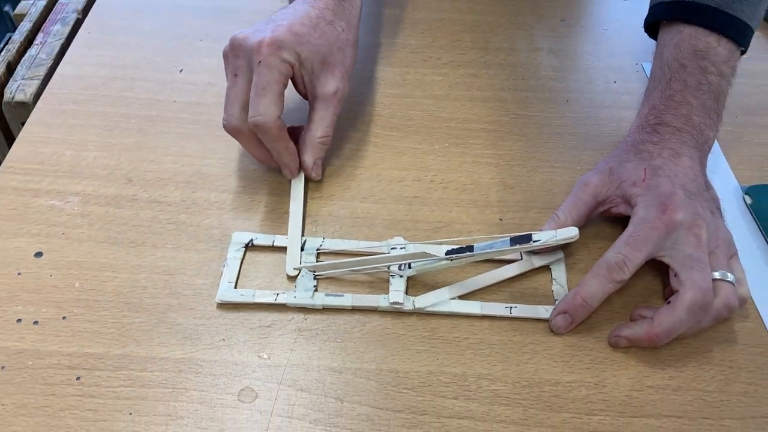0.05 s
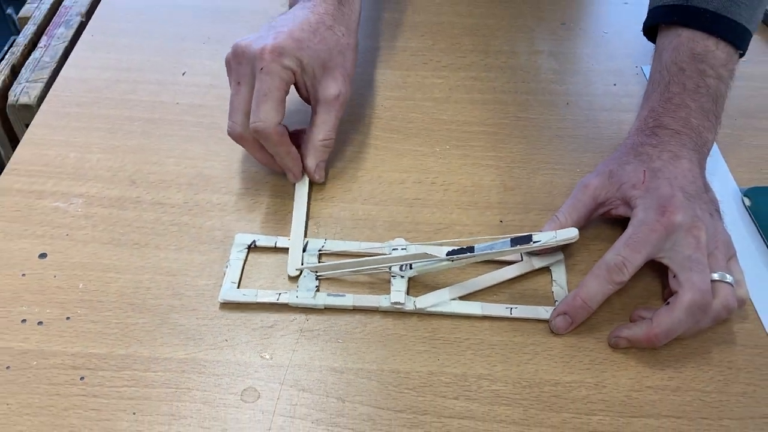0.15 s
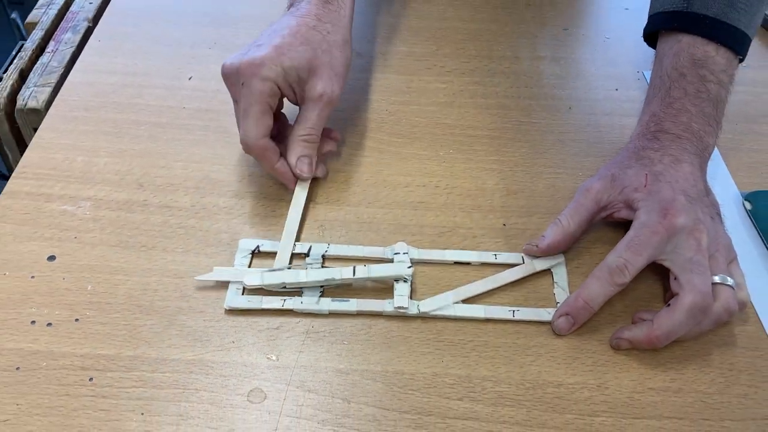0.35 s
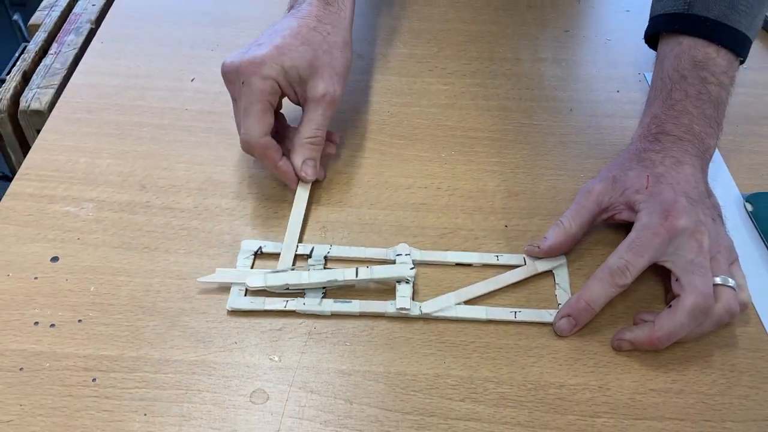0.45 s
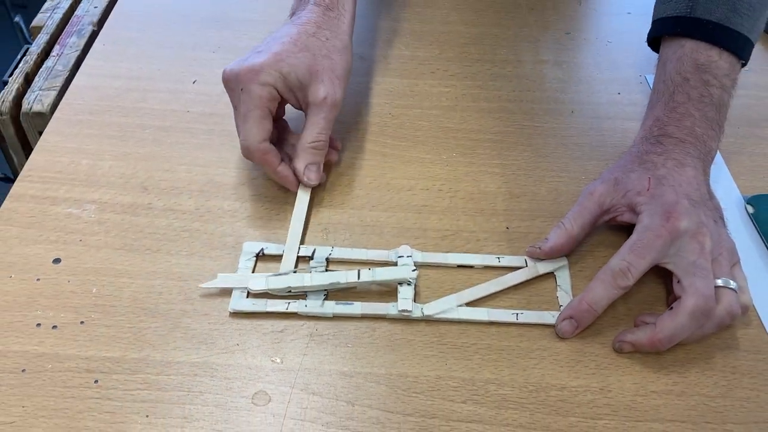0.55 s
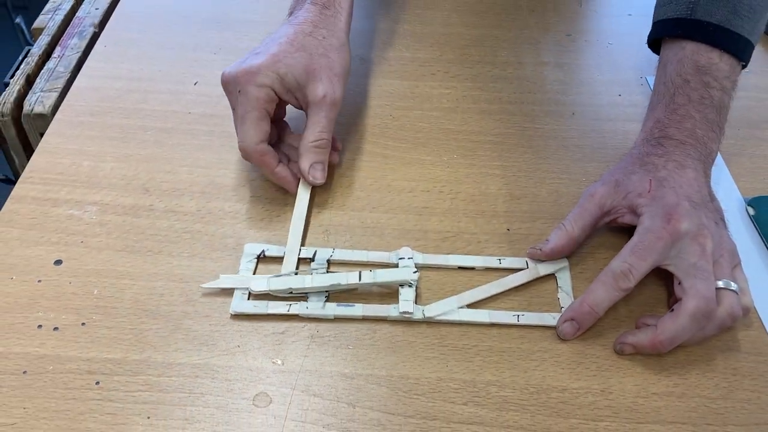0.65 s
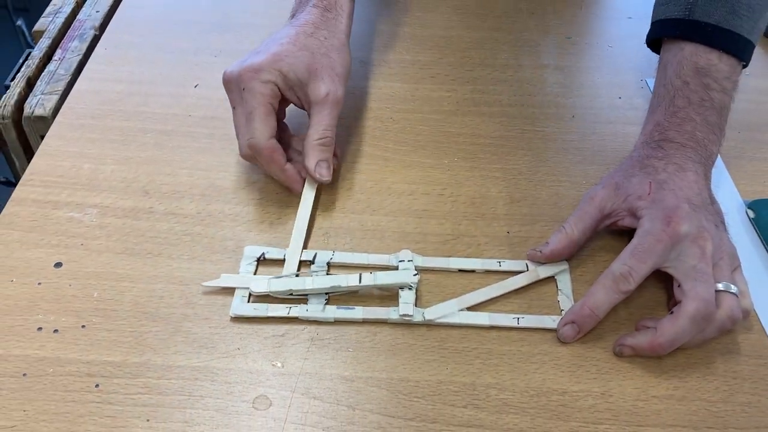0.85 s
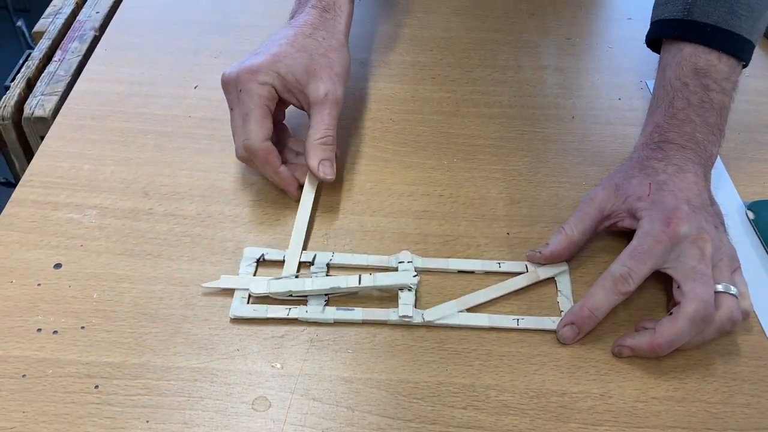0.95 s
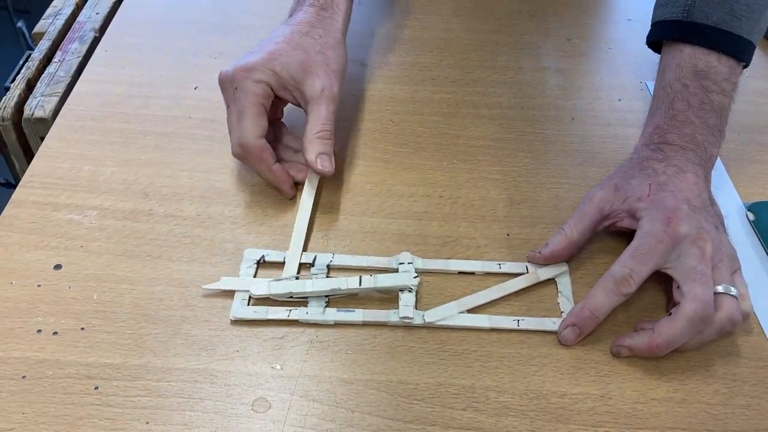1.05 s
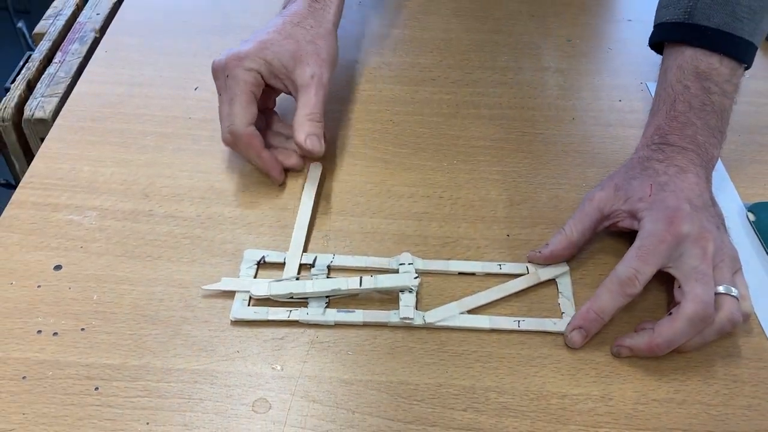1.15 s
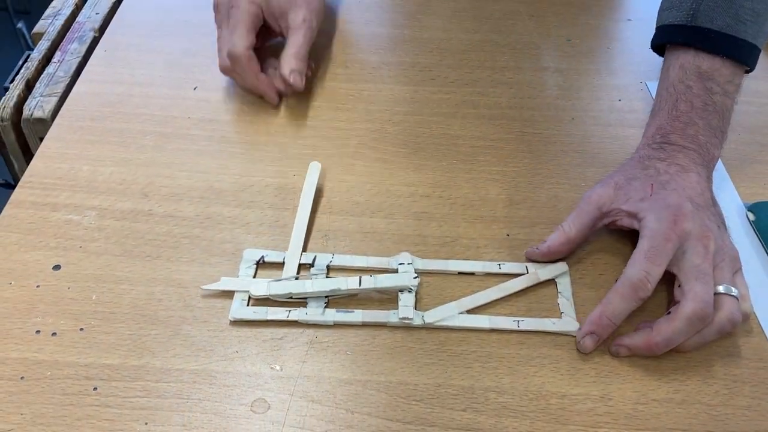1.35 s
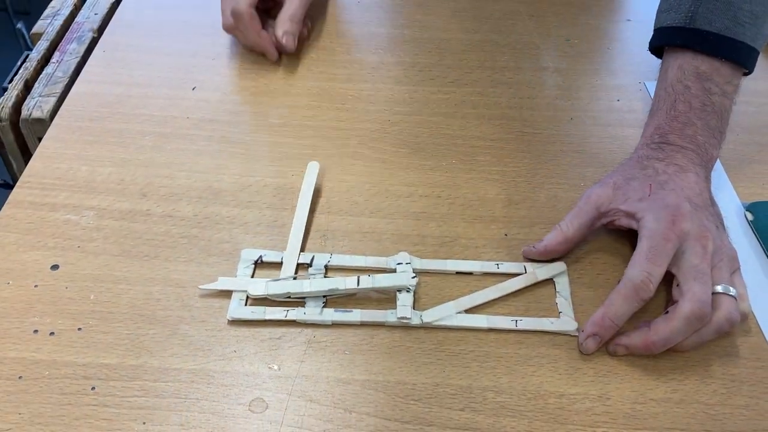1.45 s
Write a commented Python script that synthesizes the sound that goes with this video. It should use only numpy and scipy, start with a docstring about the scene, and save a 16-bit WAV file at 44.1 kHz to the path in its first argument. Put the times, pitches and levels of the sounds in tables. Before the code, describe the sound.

Loud bright wooden snap as a stick trap goes off, then quiet and faint hand rustling

```python
"""Over low room noise and faint hum, wooden sticks scrape and a sprung trap of flat sticks goes off on a table:
a hollow knock, then a burst of bright slaps from the arm on the frame, with a thump below.
Noise bursts make the cracks, damped sines the ringing wood; a live room answers with a noise tail.
The recorder's gain ducks and recovers; light finger touches follow, and the hand draws back with a soft
brushing of shaped noise. Rough noise makes the scrapes, and a low rumble comes and goes."""
import sys
import numpy as np
from scipy import signal
from scipy.fft import rfft, irfft, next_fast_len
from scipy.io import wavfile
from scipy.ndimage import uniform_filter1d, minimum_filter1d, map_coordinates

SR = 44100
rng = np.random.default_rng(int(sys.argv[2]) if len(sys.argv) > 2 else 0)


def to_wav(s):
    """Save 16-bit WAV."""
    ch = np.atleast_2d(s).T  # columns
    pcm = np.round(np.clip(ch, -1, 1) * 32767)  # PCM
    wavfile.write(sys.argv[1], SR, pcm.astype(np.int16))


N = 66150  # length in samples

# Room noise spectrum: pitch_hz, level_db (relative)
FLOOR_COLOUR = [(25, -8.5), (60, -9), (130, 6.5), (200, -7.5), (250, -9), (330, -9), (500, -16), (860, -14),
                (1300, -23), (3000, -31.5), (8000, -39), (16000, -44.5)]
# Room noise stereo image: pitch_hz, left_right_likeness (0 to 1)
FLOOR_LIKENESS = [(60, .85), (250, 0.95), (1000, 0.14), (4000, 0.033)]
# Steady tones in the room: pitch_hz, level_db (rms)
HUM_TONES = [(124, -74), (249, -76.5), (850, -86.5), (1965, -90.5)]
FLOOR_DB, FLOOR_SWAY_DB = -67.5, 1  # rms level; size of the slow random sway

# Low rumble under the handling: time_s, level_db
RUMBLE_LEVEL = [(0, -100), (.12, -66), (0.169, -56.5), (.21, -57.5), (.5, -61), (.61, -60), (0.721, -64.5),
                (.98, -68), (1.169, -69), (1.271, -61), (1.42, -59), (1.5, -60)]
# Rumble spectrum: pitch_hz, level_db (relative)
RUMBLE_COLOUR = [(25, -7.5), (55, 1), (130, -9.5), (220, -16.5), (400, -29), (2000, -67.5)]

# Wood sliding on wood: the trigger creeps and slips, the arm rubs along the frame, a stick settles:
# start_s, length_s, level_db (before the low cut), tilt_db_per_octave, swell_db (total rise)
SLIDES = [(0.179, .057, -69.5, -3.5, 7.5), (0.236, .009, -40, -3.5, 7.5), (.254, .012, -39, -3, 3),
          (0.267, 0.011, -33, -5.5, 9), (0.842, 0.0117, -79.5, 1, 1)]
SLIDE_EDGE_S, SLIDE_ROUGH_DB, SLIDE_CATCH_HZ, SLIDE_LOW_CUT_HZ = 0.0005, 0.5, 722, 601

# Room decay: pitch_hz, t60_s
ROOM_T60 = [(100, 1.126), (500, 0.66), (2000, 0.66), (5000, 0.51), (10000, 0.38), (15000, 0.32)]
# Room tail spectrum: pitch_hz, level_db (relative)
ROOM_COLOUR = [(60, -14), (130, -5.5), (200, -2.5), (320, 0), (560, 2.5), (780, -0.5), (1050, 0), (1500, 4),
               (2300, 3.5), (3500, -1.5), (5500, -1.5), (8000, -9), (12000, -6), (16000, -13.5)]
# Diffuse stereo image, shared by tail, table thud and swish: pitch_hz, left_right_likeness (0 to 1)
DIFFUSE_LIKENESS = [(100, 0.95), (500, 1), (1500, 0), (8000, 0)]
ROOM_DB, ROOM_BUILD_S = -11, 0.0047  # tail gain before colouring; build-up time constant

# Contacts of wood on wood:
# start_s, crack_db, crack_tilt_db_per_octave, frame_ring_db, table_thump_db (gains on each layer)
CONTACTS = [(.2411, -17.5, -3, -29.5, -29.5), (.2454, -26.5, -1, -46.5, -35.5),
            (.2542, -30.5, 2.5, -50, -40), (.2567, -26, 0, -48, -36), (.2622, -24.5, -1.5, -49, -47.5),
            (.2737, 4, 5, -25.5, -28.5), (.2757, 6.5, 5, -25.5, -26), (.2767, 1.5, -1.5, -28.5, -29.5),
            (.2777, 5, 14.5, -25.5, -25.5), (.2822, 3.5, -1.5, -17.5, -20), (.2831, 10, 3, -8.5, -10.5),
            (.2853, -3, 4, -17, -22)]
# Light touches of the fingers on the sticks: same columns as CONTACTS
TOUCHES = [(.700, -52.5, -8, -72, -100), (.947, -72, 3, -95, -91), (1.2415, -49.5, -4.5, -76, -51),
           (1.368, -53.5, -9, -56, -55.5)]
# Spectrum of cracking and scraping wood: pitch_hz, level_db (relative)
CRACK_COLOUR = [(100, -26.5), (500, -4.5), (1500, -8.5), (3600, -1), (5600, -4.5), (7000, 7), (7900, 6),
                (9200, -14.5), (10800, 9.5), (12200, 0), (13600, -14), (15200, 1), (16800, -20.5)]
# Stereo image of cracks and scrapes: pitch_hz, left_right_likeness (0 to 1)
CRACK_LIKENESS = [(500, 0.65), (3000, 0.14), (12000, 0.11)]
# High modes of the single sticks, rung by the crack: pitch_hz, level_db (relative to crack gain), t60_s
STICK_MODES = [(6880, -31.5, .09), (6870, -25.5, 0.033), (8010, -18, 0.051), (10440, -24.5, 0.014),
               (11300, -32.5, 0.067), (12400, -23, 0.024), (12390, -29.5, 0.045)]
# Modes of the glued frame: pitch_hz, level_db (relative), t60_s
FRAME_MODES = [(385, -20.5, 0.01), (550, -13.5, 0.012), (570, -14, .05), (740, -17.5, 0.025),
               (960, -19.5, 0.021), (1049, -6, .024), (1325, -14.5, .02), (1549, -11, .04),
               (1935, -12.5, .025), (2782, -12.5, 0.0073), (3080, -11.5, .02), (3500, -12.5, .016),
               (4150, -5, 0.019), (4443, -4, .016)]
# Modes of the table top: pitch_hz, level_db (relative), t60_s
TABLE_MODES = [(74, -5.5, .07), (114, -3, 0.042), (178.3, -4, 0.087), (199, -13, .14)]
# Dense, quickly damped modes of the table, as a noise spectrum: pitch_hz, level_db (relative)
THUD_COLOUR = [(30, -26), (70, -3), (130, 3.5), (200, 2), (320, -9), (560, -4), (900, -5), (1500, -22),
               (4000, -50.5)]
CRACK_RISE_S, CRACK_HOLD_S, CRACK_T60_S, TILT_PIVOT_HZ = .0001, 0.00049, .0035, 8020
SHIVER_DB, SHIVER_T60_S = -24.5, 0.12  # the glued sticks go on buzzing after each crack
THUD_DB, THUD_T60_S, TABLE_RISE_S = -1.5, 0.061, 0.0058
RIGHT_LEAD_S = .00007  # the right microphone is nearer

# The trigger stick rings as it slips free: pitch_hz, level_db (relative), t60_s
TRIGGER_MODES = [(499.8, -19.5, .022), (766, -10.5, .034), (1072, 1, 0.039), (1545, -14, 0.05),
                 (2660, -14.5, .014), (3330, -7, .016), (4250, -3, .011), (4520, -4.5, .013)]
TRIGGER_S, TRIGGER_DB = .2413, -25
# Each blow lands elsewhere and strains the glued joints differently:
MODE_VARY_DB, MODE_DETUNE = 1.2, .012  # random spread of level, and of pitch as a fraction
MODE_SPREAD, SPREAD_FULL_HZ = 1, 1900  # phase scatter between channels (radians), full from this pitch up

# Hiss of the withdrawing hand: time_s, level_db
BRUSH_LEVEL = [(1.04, -88.5), (1.119, -72), (1.19, -62.5), (1.27, -59.5), (1.388, -56.5), (1.5, -58.5)]
# Hiss spectrum: pitch_hz, level_db (relative)
BRUSH_COLOUR = [(200, -16.5), (1400, -16), (3300, -5), (4600, 4.5), (5700, -8.5), (7800, 7), (9200, -8.5),
                (11000, 9), (13600, -7.5), (15200, 3), (16500, -11.5)]
# Darker part of the brushing: time_s, level_db (before its grain)
SWISH_LEVEL = [(1.17, -86), (1.27, -70), (1.33, -72.5), (1.41, -66.5), (1.5, -65.5)]
# Swish spectrum: pitch_hz, level_db (relative)
SWISH_COLOUR = [(200, -6.5), (600, -3), (1400, 9), (2600, -2), (3500, -8), (8000, -19)]
SWISH_GRAIN_DB, SWISH_GRAIN_HZ = 1, 117

LIMIT_DB, HOLD_S, RELEASE_DB_PER_S, CLIP_LEVEL = -11, 0.071, 94, 0.99
LOW_CUT_HZ, TOP_HZ = 45, 16600


def amp(db):
    """Decibels to gain."""
    return 10 ** (np.asarray(db) / 20)


def unit(x):
    """Scale to rms 1."""
    return x / np.sqrt(np.mean(x ** 2) + 1e-20)


def along(points, hz):
    """Read (pitch_hz, value) points on a log pitch axis."""
    f, v = np.transpose(points)
    return np.interp(np.log(hz + 1), np.log(f + 1), v)


def level(points):
    """Gain per sample from (time_s, level_db) points."""
    return amp(np.interp(np.arange(N) / SR, *np.transpose(points)))


def fade(t, t60):
    """Exponential decay by 60 dB in t60 seconds."""
    return np.exp(-np.log(1000) * t / t60)


def wobble(hz):
    """A random curve with hz knots a second, joined by straight lines."""
    return map_coordinates(rng.standard_normal(N // 20), [np.arange(N) / SR * hz], order=1)


def filtered(x, response):
    """Shape x by a frequency response, padded so its tail does not wrap round."""
    n = x.shape[-1]
    m = next_fast_len(n + SR // 4)
    spectrum = rfft(x, m) * response(np.fft.rfftfreq(m, 1 / SR))
    return irfft(spectrum, m)[..., :n]


def paired(two, likeness):
    """Blend two unrelated signals into a left and right of given likeness."""
    def mid_side_gains(hz):
        turn = np.arccos(np.clip(along(likeness, hz), -1, 1)) / 2
        return np.array([np.cos(turn), np.sin(turn)])

    mid, side = filtered(two, mid_side_gains)
    return np.array([mid + side, mid - side])


def noise(spectrum, likeness, size=N, tilt_db=0):
    """Coloured stereo noise of rms 1, tilted in dB per octave about the pivot."""
    def colour(hz):
        octaves = np.log2(np.maximum(hz / TILT_PIVOT_HZ, 1 / 10))
        return amp(along(spectrum, hz) + tilt_db * octaves)

    stereo = paired(rng.standard_normal((2, size)), likeness)
    return unit(filtered(stereo, colour))


def ring(modes, t):
    """Damped sines, a little different at each blow; low modes reach both channels alike."""
    out = np.zeros((2, len(t)))
    for hz, db, t60 in modes:
        scatter = MODE_SPREAD * min(hz / SPREAD_FULL_HZ, 1)
        phase = scatter * rng.standard_normal((2, 1))
        pitch = hz * (1 + MODE_DETUNE * rng.standard_normal())
        gain = amp(db + MODE_VARY_DB * rng.standard_normal())
        out += gain * fade(t, t60) * np.sin(2 * np.pi * pitch * t + phase)
    return out


def background():
    """Low room noise that sways slightly, with a faint hum of steady sines."""
    t = np.arange(N) / SR
    sway = map_coordinates(rng.standard_normal(20), [t * 10])  # smooth curve, 10 knots a second
    air = amp(FLOOR_DB + FLOOR_SWAY_DB * sway) * noise(FLOOR_COLOUR, FLOOR_LIKENESS)
    hum = np.zeros(N)
    for hz, db in HUM_TONES:
        hum += amp(db) * np.sqrt(2) * np.sin(2 * np.pi * (hz * t + rng.random()))
    return air + hum


def rumble():
    """Low noise comes and goes under the handling."""
    return level(RUMBLE_LEVEL) * noise(RUMBLE_COLOUR, FLOOR_LIKENESS)


def slides():
    """Dry sticks rub and catch: short, swelling noise scrapes in the colour of the wood."""
    out = np.zeros((2, N))
    for start_s, length_s, level_db, tilt_db, swell_db in SLIDES:
        t = np.arange(N) / SR - start_s
        gate = np.clip(np.minimum(t, length_s - t) / SLIDE_EDGE_S + .5, 0, 1)
        push_db = level_db + swell_db * (np.clip(t / length_s, 0, 1) - .5)
        rough_db = SLIDE_ROUGH_DB * wobble(SLIDE_CATCH_HZ)
        out += gate * amp(push_db + rough_db) * noise(CRACK_COLOUR, CRACK_LIKENESS, tilt_db=tilt_db)
    low_cut = signal.butter(2, SLIDE_LOW_CUT_HZ, 'highpass', fs=SR, output='sos')
    return signal.sosfilt(low_cut, out)


def room(x):
    """A diffuse noise tail builds up, then dies sooner in the treble than in the bass."""
    hz, t, bands = signal.stft(rng.standard_normal((2, SR)), SR, nperseg=256)
    shape = fade(t, along(ROOM_T60, hz)[:, None]) * (1 - np.exp(-t / ROOM_BUILD_S))
    decaying = signal.istft(bands * shape, SR, nperseg=256)[1]
    tail = paired(decaying, DIFFUSE_LIKENESS)
    tail = tail / np.linalg.norm(tail[0])
    tail = filtered(tail, lambda f: amp(ROOM_DB + along(ROOM_COLOUR, f)))
    return signal.fftconvolve(x, tail, axes=1)[:, :N]


def trap(contacts):
    """Each contact cracks, sets the sticks buzzing and the frame ringing, and thumps the table."""
    out, t = np.zeros((2, N + SR)), np.arange(SR // 3) / SR
    snap = fade(np.maximum(t - CRACK_HOLD_S, 0), CRACK_T60_S)
    shiver = amp(SHIVER_DB) * fade(t, SHIVER_T60_S)
    envelope = (1 - np.exp(-t / CRACK_RISE_S)) * (snap + shiver)
    envelope_rms = np.sqrt(np.mean(envelope ** 2))
    for start_s, crack_db, tilt_db, frame_db, table_db in contacts:
        burst = envelope * noise(CRACK_COLOUR, CRACK_LIKENESS, size=len(t), tilt_db=tilt_db)
        crack = unit(burst) * envelope_rms  # equal energy at every draw
        thud = amp(THUD_DB) * fade(t, THUD_T60_S) * noise(THUD_COLOUR, DIFFUSE_LIKENESS, size=len(t))
        thump = (ring(TABLE_MODES, t) + thud) * (1 - np.exp(-t / TABLE_RISE_S))
        blow = amp(crack_db) * (crack + ring(STICK_MODES, t))
        blow += amp(frame_db) * ring(FRAME_MODES, t) + amp(table_db) * thump
        start = round(start_s * SR)
        out[:, start:start + len(t)] += blow
    # half the lead delays the left, half advances the right
    side = np.array([[-1], [1]])
    return filtered(out[:, :N], lambda hz: np.exp(side * 1j * np.pi * hz * RIGHT_LEAD_S))


def trigger():
    """The trigger stick slips off the arm and rings in damped modes, a hollow knock."""
    t = np.arange(N) / SR - TRIGGER_S
    return amp(TRIGGER_DB) * (t >= 0) * ring(TRIGGER_MODES, np.maximum(t, 0))


def brushing():
    """Hand and sleeve draw back: a soft noise hiss, joined by a darker, grainy swish."""
    hiss = level(BRUSH_LEVEL) * noise(BRUSH_COLOUR, DIFFUSE_LIKENESS)
    grain = amp(SWISH_GRAIN_DB * wobble(SWISH_GRAIN_HZ))
    swish = level(SWISH_LEVEL) * grain * noise(SWISH_COLOUR, DIFFUSE_LIKENESS)
    return hiss + swish


def scene():
    """The trap in its room, the hands and the background; only the wood feeds the room tail."""
    wood = slides() + trap(CONTACTS) + trigger() + trap(TOUCHES)
    return background() + rumble() + wood + room(wood) + brushing()


def record(dry):
    """A limiter ducks on the snap, holds and recovers; peaks round off; deep bass and top are cut."""
    t, hold = np.arange(N) / SR, int(HOLD_S * SR) // 2 * 2 + 1
    power = np.abs(uniform_filter1d(np.mean(dry ** 2, axis=0), size=64))
    needed_db = np.minimum(0, LIMIT_DB - 10 * np.log10(power + 1e-12))
    held_db = minimum_filter1d(needed_db, hold, origin=hold // 2)
    # the gain drops at once but climbs back no faster than the release
    release_db = RELEASE_DB_PER_S * t
    gain_db = np.minimum.accumulate(held_db - release_db) + release_db
    smooth_db = uniform_filter1d(minimum_filter1d(gain_db, size=65), size=65)
    limited = dry * amp(smooth_db)
    rounded = limited / (1 + (limited / CLIP_LEVEL) ** 6) ** (1 / 6)
    low_cut = signal.butter(2, LOW_CUT_HZ, 'highpass', fs=SR, output='sos')
    return filtered(signal.sosfilt(low_cut, rounded), lambda hz: 1 / (1 + (hz / TOP_HZ) ** 80))


dry = scene()
out = record(dry)
to_wav(out)
```